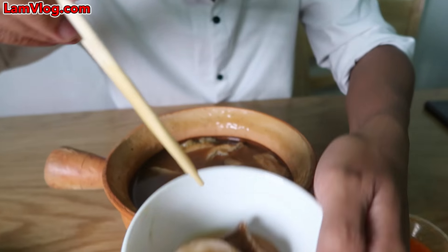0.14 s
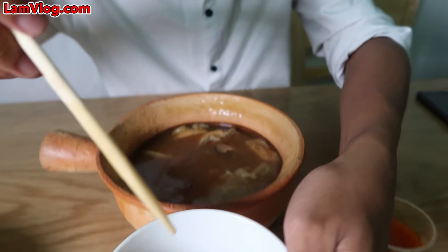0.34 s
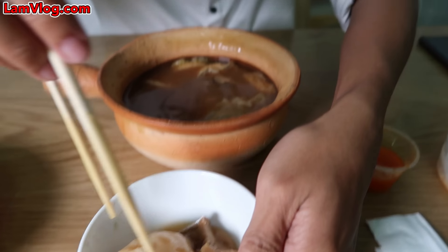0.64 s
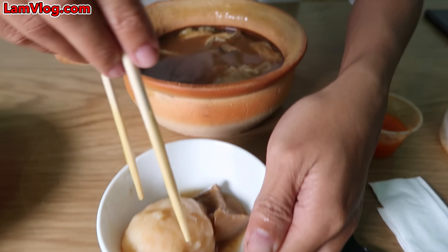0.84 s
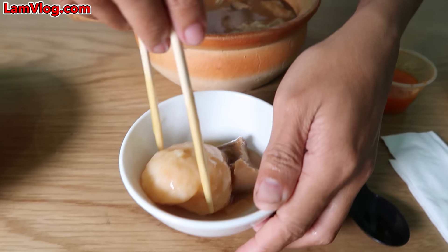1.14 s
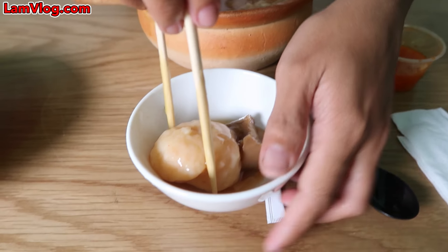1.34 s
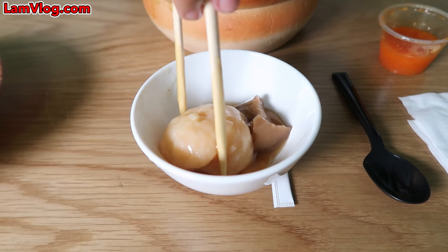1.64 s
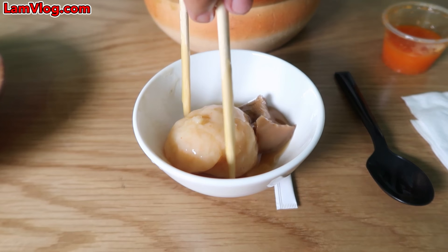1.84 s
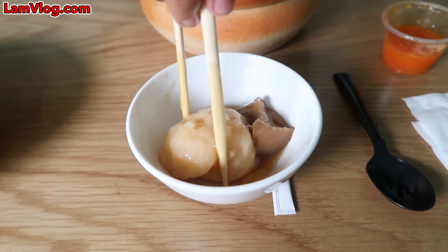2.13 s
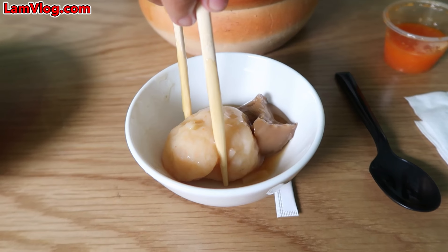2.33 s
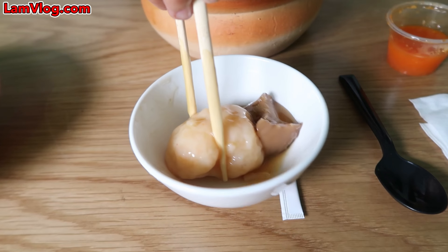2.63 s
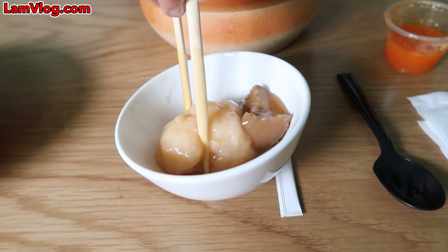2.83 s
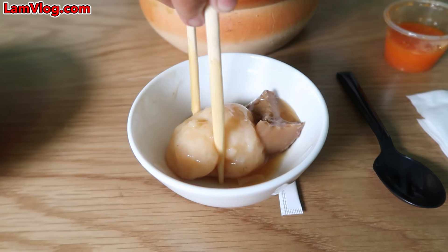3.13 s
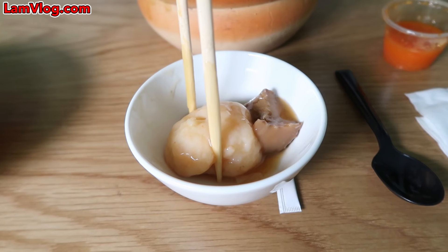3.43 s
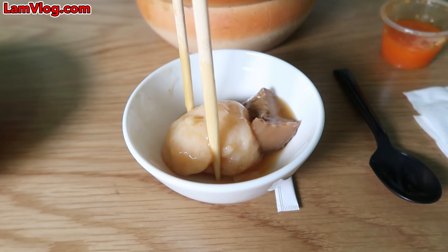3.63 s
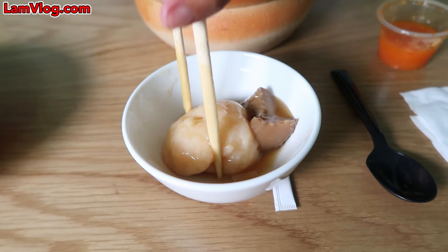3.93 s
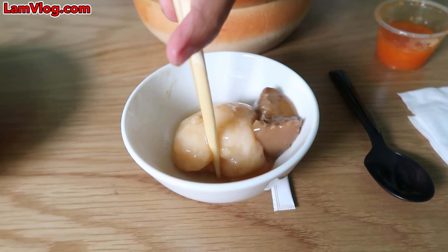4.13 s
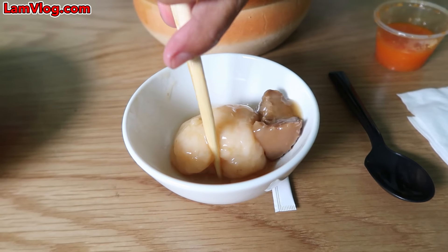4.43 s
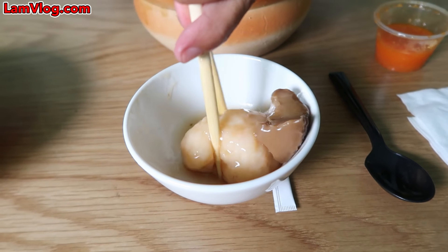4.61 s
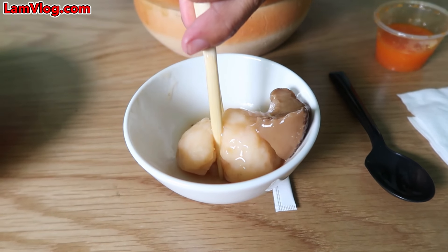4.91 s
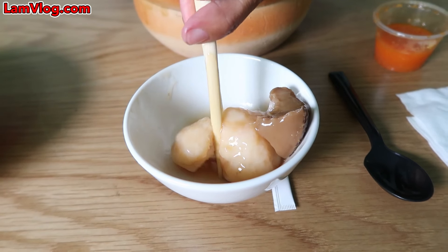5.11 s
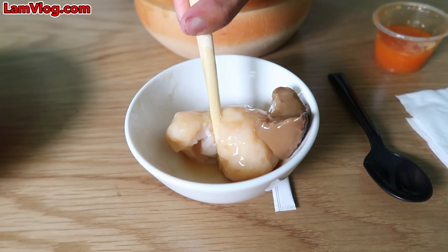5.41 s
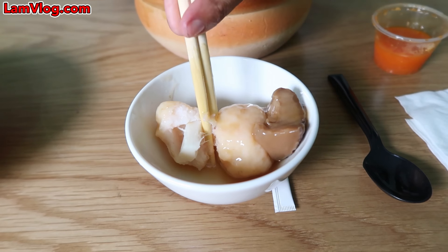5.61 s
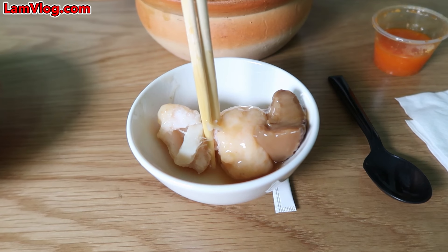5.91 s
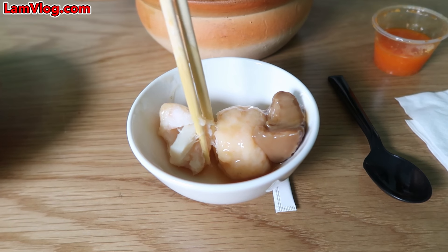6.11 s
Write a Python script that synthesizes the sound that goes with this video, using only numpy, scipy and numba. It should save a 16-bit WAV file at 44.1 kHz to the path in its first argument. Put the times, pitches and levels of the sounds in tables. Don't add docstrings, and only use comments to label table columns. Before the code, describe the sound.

Chopsticks tick and skid on a ceramic bowl that knocks a wooden table, while a cricket trills steadily over a humming room.

```python
import sys
import numpy as np
from scipy import signal
from scipy.fft import rfft, irfft
from scipy.io import wavfile
from scipy.ndimage import uniform_filter1d
from numba import njit

SR = 44100
rng = np.random.default_rng(int(sys.argv[2]) if len(sys.argv) > 2 else 0)


def generate_wav(signal):
    frames = np.transpose(np.atleast_2d(signal))
    scaled = np.clip(frames, -1, 1) * 32767
    pcm = np.round(scaled).astype(np.int16)
    wavfile.write(sys.argv[1], SR, pcm)


def voltage_ratio(level):
    return 10 ** (np.asarray(level, float) / 20)


N = 275972
TIME = np.arange(N) / SR

# pitch_hz, level_db (per Hz)
AIR_HISS = [(88, -25.5), (150, 1.5), (334, -7), (524, -14.5), (900, -18.5), (1360, -22), (3600, -27.5),
            (5000, -30.5), (7600, -35.5), (11000, -42), (13200, -45.5), (16000, -58)]
AIR_HISS_DB = -49.5
# pitch_hz, width_hz, level_db
ROOM_HUM = [(84.7, 22, 5), (128.2, 30, 2.5), (214.3, 18, -12)]
# time_s, level_db
HOUSE_BUSTLE = [(0.0, -50), (0.26, -44.5), (0.4, -42.5), (1.48, -53.5), (1.76, -49), (2.09, -48.5),
                (2.52, -50.5), (2.8, -48.5), (3.08, -51.5), (3.66, -56), (4.18, -50), (4.53, -52.5),
                (5.05, -52.5), (5.24, -51), (5.78, -49.5), (6.25, -53)]
# centre_s, half_length_s, level_db
ARM_LEANS = [
    (0.02, .06, -56),
    (.9, .12, -58),
    (2.15, .2, -55.5),
    (2.6, 0.17, -57),
    (2.95, .15, -50.5),
    (3.7, .15, -59),
    (4.045, .15, -57),
    (4.474, 0.14, -49.5),
    (4.8, 0.18, -55),
    (5.65, 0.21, -51.5),
]
FLOOR_RUMBLE_DB = -61.5
WHINE_HZ, WHINE_DB = 13060, -90
# pitch_hz, side_db
FAR_SIDE = [(60, -33), (110, -33.5), (200, -14.5), (380, -4.5), (700, -4), (1290, -2), (2380, -2.5),
            (4400, 0), (8120, 0), (15000, 3)]
# pitch_hz, side_db
NEAR_SIDE = [(60, -34), (110, -38.5), (200, -51), (380, -17.5), (700, -19.5), (1290, -14.5), (2380, -2.5),
             (4400, -1.5), (8120, 23), (15000, 2)]
# pitch_hz, t60_s
ROOM_DECAY = [(100, 0.78), (400, 0.33), (1500, 0.59), (4000, 0.25), (12000, 0.48)]

# centre_s, level_db
CHIRPS = [(0.184, -56.5), (0.422, -55), (0.677, -55), (0.911, -57), (1.162, -58), (1.417, -56.5),
          (1.668, -56), (1.886, -56.5), (2.149, -56), (2.396, -56), (2.615, -58), (2.867, -58.5),
          (3.106, -57.5), (3.37, -75), (3.671, -70), (3.871, -60), (4.113, -57), (4.385, -56.5),
          (4.621, -56.5), (4.886, -57), (5.122, -54.5), (5.369, -57), (5.597, -55.5), (5.822, -56.5),
          (6.092, -56)]
# pitch_hz, width_hz, level_db, half_swell_s
WING = [(4148, 180, -4.5, 0.11), (4340, 200, -2, 0.1), (4536, 217, 1.5, 0.059)]

# centre_s, half_length_s, level_db
RUSTLES = [
    (.49, .04, -58),
    (3.65, .06, -64),
    (5.36, .05, -60),
]

# start_s, level_db (peak), stick_hz, glaze_db (against the stick)
TICKS = [(0.4693, -53, 2450, -21), (1.727, -52.5, 2630, -2), (2.3634, -64, 3160, -7),
         (2.8165, -46, 1610, -35), (3.2874, -38, 1950, -26), (3.6102, -44.5, 2700, -27),
         (4.8641, -34, 1890, -2), (4.8774, -37.5, 1960, -11), (4.8854, -37.5, 2280, -7),
         (4.9574, -54, 1840, -8), (4.969, -56, 1910, 2), (5.041, -40, 2880, -3), (5.0703, -46, 1500, -14),
         (5.1861, -50.5, 2580, -14), (5.2167, -48, 2820, -15), (5.3026, -36.5, 2730, -43),
         (5.3105, -37, 2610, -34), (5.3214, -43, 2700, -27), (5.3345, -43.5, 2770, -38),
         (5.5324, -51, 3340, -8), (5.55, -52, 1900, -5), (5.5604, -46, 2180, -3.5),
         (5.5825, -29.5, 2050, -5), (5.6098, -41, 2120, 1), (5.7697, -35.5, 2030, 3), (5.776, -44, 2040, 4),
         (5.7936, -40.5, 2300, 3), (5.8034, -47, 1960, 0), (6.2197, -49, 2350, -22)]
# pitch_share (of stick_hz), level_db, t60_s
STICK_MODES = [(0.97, -3.5, 0.022), (1.317, -5, 0.0058), (0.772, -5.5, 0.02), (0.478, -4.5, 0.016)]
# pitch_hz, level_db, t60_s
GLAZE_MODES = [(6700, 7, 0.0062), (7470, -12.5, 0.0047), (9070, -4.5, 0.008), (11660, -16, .007)]
GLANCE_DB_PER_DB = 0.37
# start_s, level_db
PRESSES = [
    (4.868, -52.5),
    (5.305, -53),
    (5.582, -38.5),
    (5.6, -40),
    (5.772, -49),
    (5.795, -49.5),
]
# pitch_hz, level_db, t60_s
WALL_MODES = [(647, -8, 0.15), (764, -5, 0.11), (874, -5, 0.22), (1015, -4.5, 0.19), (1303, -8.5, 0.13)]
# start_s, level_db
RIM_PINGS = [
    (4.866, -36.5),
    (4.887, -36),
    (5.551, -46),
    (5.584, -47),
]
# pitch_hz, level_db, t60_s
RIM_MODES = [(2160, 0, .08)]

# start_s, level_db (peak), thud_hz, ring_db, brightness_db (per octave)
KNOCKS = [(0.47, -29.5, 340, -21, 4.5), (0.826, 5, 350, -29.5, -2), (0.9306, -17, 560, -25, -7),
          (1.124, -26, 260, -22, -6.5), (1.231, -27.5, 267, -16, -7), (1.382, -16.5, 435, -19.5, -3),
          (2.815, -22, 292, -22.5, -10), (3.185, -16.5, 264, -8, -3), (3.194, 3, 371, -20.5, 2),
          (3.202, -38, 340, -21, 3), (3.62, -47, 377, -27, 12.5), (4.43, -33, 287, -14, -3),
          (4.866, -28.5, 287, -20.5, -11.5), (4.879, -40, 338, -11, -9), (4.888, -36.5, 322, -11, -9),
          (5.071, -31.5, 305, -21, -8.5), (5.583, -30, 343, -12, 2), (5.601, -28.5, 284, -24, 2.5),
          (5.689, -37, 336, -14, -12), (5.7096, -31, 260, -18, 2), (5.724, -31.5, 320, -28, -4),
          (5.773, -36, 330, -11, 8), (5.799, -36, 326, -19, 8)]
# pitch_hz, level_db, t60_s
BOARD_MODES = [(167.1, -8.5, 0.28), (333, -0.5, .5), (407, -21, 0.22), (549.3, -3, 0.48),
               (709.6, -4.5, 0.39), (731, -10, 0.19), (877, -12.5, .25), (883, -8.5, 0.28),
               (1008, -19.5, 0.083), (1048, -12.5, 0.28), (1246, -12, 0.28), (1435, -13.5, 0.36),
               (1625, -11, .2), (1738, -5.5, 0.11)]
# pitch_hz, level_db, t60_s
BOARD_DENSE = [(60, -19.5, 0.31), (125.6, -9.5, 0.6), (306, 5, 0.1), (641, 1.5, 0.49), (990, -6.5, 0.078),
               (1750, -13, 0.68), (3000, -30.5, 0.26), (5000, -47, .2)]
# start_s, level_db, pitch_hz, t60_s
LEG_THUMPS = [
    (.84, -39.5, 63.7, .6),
    (2.829, -37.5, 73.6, .4),
    (5.589, -30.5, 72.3, 0.22),
]
RATTLE_DB, RATTLE_DB_PER_DB = -14, -0.05
LAND_S, LAND_DB_PER_DULL = 0.00025, -0.7
CONTACT_HZ, CONTACT_DB_PER_DB = 3450, 0.53
HAND_OFF_S, HAND_DAMP = 1.5, .5

# start_s, length_s, level_db
SKIDS = [(5.581, 0.0068, -35), (5.590, 0.011, -30.5), (5.495, .005, -60), (4.68, .01, -64),
         (2.362, .003, -60), (5.575, 0.0027, -50), (.827, 0.0062, -52), (3.186, .016, -52),
         (3.225, .02, -62), (5.545, .03, -60), (5.035, .012, -56)]
# pitch_hz, level_db (per Hz)
SKID_COLOUR = [(590, -21), (1000, -3), (2010, 1.5), (4020, 0.5), (4960, 4), (5970, -7.5), (7440, 2),
               (14200, -9), (16000, -25)]


def colour(x, points):
    hz, db = np.transpose(points)
    f = np.fft.rfftfreq(x.shape[-1], 1 / SR) + 1
    return irfft(rfft(x) * voltage_ratio(np.interp(np.log(f), np.log(hz), db)), x.shape[-1])


def band(x, hz, width):
    return signal.lfilter(*signal.iirpeak(hz, hz / width, SR), x)


def band_twice(x, hz, first_width, second_width):
    return band(band(x, hz, first_width), hz, second_width)


def level(x, db):
    return x * voltage_ratio(db) / np.sqrt(np.mean(x ** 2))


def walk(rate):
    k = int(SR / rate)
    held = np.repeat(rng.standard_normal(N // k + 1), k)
    return 1.8 * uniform_filter1d(uniform_filter1d(held, k), k)[:N]


def ring(modes, scatter_db, t, loose=0.0025):
    hz, db, t60 = np.transpose(modes)[:, :, None]
    chance = rng.standard_normal((2, *db.shape))
    tone = np.sin(2 * np.pi * hz * (1 + loose * chance[0]) * t)
    return (voltage_ratio(db + scatter_db * chance[1]) * tone * 1000. ** (-t / t60)).sum(axis=0)


def add(out, s, sound):
    i = int(s * SR)
    out[..., i:i + sound.shape[-1]] += sound[..., :N - i]


def pair(mid, other, side):
    return mid + colour(other, side) * np.array([[1], [-1]])


def air():
    noise = rng.standard_normal((2, N))
    hiss = level(colour(noise, AIR_HISS), AIR_HISS_DB) * voltage_ratio(0.8 * walk(2.0))
    hum = sum(voltage_ratio(db + 1.66 * walk(6)) * band_twice(noise, f, w, w) for f, w, db in ROOM_HUM)
    bustle = voltage_ratio(np.interp(TIME, *np.transpose(HOUSE_BUSTLE)))
    deep = band_twice(noise, 38, 30, 35)
    leans = sum(voltage_ratio(db) * np.exp(-((TIME - s) / half) ** 2) for s, half, db in ARM_LEANS)
    sway = voltage_ratio(FLOOR_RUMBLE_DB) + leans
    mix = hiss + level(hum, 0) * bustle + level(deep, 0) * sway
    whine = voltage_ratio(WHINE_DB) * np.sin(2 * np.pi * WHINE_HZ * TIME)
    return pair(mix[0], mix[1], FAR_SIDE) + whine


def cricket(stroke_hz=38.63, smear_s=0.32, between_db=-68):
    song, t = np.zeros((2, N)), TIME[:SR // 2]
    for s, chirp_db in CHIRPS:
        pace_hz = stroke_hz * (1 + .01 * rng.standard_normal())
        strokes = np.diff(np.floor(pace_hz * TIME[:SR]), prepend=0)
        smear = rng.standard_normal((2, len(t))) * 1000. ** (-t / smear_s)
        far = signal.fftconvolve(strokes[None], smear, axes=1)[:, SR // 2:SR]
        far = level(far, 0) + .7 * rng.standard_normal(far.shape)
        rest = voltage_ratio(between_db - chirp_db) * np.hanning(len(t))
        chirp = np.zeros_like(far)
        for k, (f, w, db, half) in enumerate(WING):
            swell = np.exp(-np.abs((t - .235 - .01 * k) / half) ** 3)
            chirp += (-1) ** k * voltage_ratio(db) * band_twice(far, f, w, w) * (swell + rest)
        first = max(int((.25 - s) * SR), 0)
        add(song, max(s - .25, 0), level(chirp, chirp_db - 5)[:, first:])
    return song[0] + voltage_ratio(-7.5) * song[1] * np.array([[1], [-1]])


def rustles(hz=1900):
    grains = rng.standard_normal(N) * voltage_ratio(2.4 * rng.exponential(size=N))
    grit = band_twice(grains, hz, 1.2 * hz, 1.2 * hz)
    return level(grit, 0) * sum(voltage_ratio(db) * np.exp(-((TIME - s) / half) ** 2) for s, half, db in RUSTLES)


def ticks():
    out, t = np.zeros((2, N)), TIME[:SR // 8]
    touch = 1 - np.exp(-(t / 0.0004) ** 2)
    for s, db, hz, glaze_db in TICKS:
        tilt_db = GLANCE_DB_PER_DB * (glaze_db + 31.5)
        modes = [(k * hz, g + tilt_db * np.log2(k), t60) for k, g, t60 in STICK_MODES]
        noise = rng.standard_normal((2, len(t)))
        burst = noise[0] * np.exp(-t / 0.0096)
        clatter = 0.89 * band(band_twice(burst, hz, hz, hz), hz, hz)
        stick = touch ** 2 * ring(modes, 1.8, t, loose=0.0047) + voltage_ratio(-1.5) * clatter
        snap = band_twice(noise[1], 8500, 9000, 9000) * np.exp(-t / 0.0012)
        glaze = voltage_ratio(-2) * ring(GLAZE_MODES, 2, t, loose=.01) + snap
        tick = stick / np.abs(stick).max() + voltage_ratio(glaze_db + 1) * glaze / np.abs(glaze).max()
        add(out, s + .0006, voltage_ratio(db + 6) * tick)
    fall = np.hanning(2 * len(t))[len(t):]
    for s, db in PRESSES:
        add(out, s, voltage_ratio(db) * touch * ring(WALL_MODES, 4.2, t, loose=0.022) * fall)
    for s, db in RIM_PINGS:
        add(out, s, voltage_ratio(db) * touch * ring(RIM_MODES, 0, t) * np.ones((2, 1)))
    return out


def board_bands():
    centres = 60 * 2 ** np.arange(0, 6.6, .5)
    noise = [band_twice(rng.standard_normal(N), f, f / 2, f / 2) * np.sqrt(SR / f) for f in centres]
    return centres[:, None], np.array(noise)


def board_rattle(t, bright_db, f, noise):
    hz, db, t60 = np.transpose(BOARD_DENSE)
    gain_db = np.interp(np.log(f), np.log(hz), db) + bright_db * np.log2(f / 400)
    fade_s = np.interp(np.log(f), np.log(hz), t60)
    return (voltage_ratio(gain_db) * noise * 1000. ** (-t / fade_s)).sum(axis=0) / 3


def knocks():
    out, t = np.zeros(N), TIME[:SR // 2]
    swing = 1 - np.exp(-t / 0.00067)
    centres, noise = board_bands()
    edge = np.sin(2 * np.pi * 950 * t) * np.exp(-t / 0.0024)
    click = np.sin(2 * np.pi * 2600 * t) * np.exp(-t / 0.0025)
    for s, db, hz, ring_db, bright_db in KNOCKS:
        thud = np.sin(2 * np.pi * hz * t) * np.exp(-(t * hz / 1.37) ** 4)
        thud += voltage_ratio(-6 + 2.6 * bright_db) * edge + voltage_ratio(-23 + 2.44 * bright_db) * click
        land_s = LAND_S * voltage_ratio(-LAND_DB_PER_DULL * bright_db)
        touch = 1 - np.exp(-(t / land_s) ** 2)
        damp = HAND_DAMP if s < HAND_OFF_S else 1
        struck = [(f, g + bright_db * np.log2(f / 400), t60 * damp) for f, g, t60 in BOARD_MODES]
        start = int(s * (SR - SR // 8))
        rattle = board_rattle(t, bright_db, centres, noise[:, start:start + len(t)])
        top = voltage_ratio(ring_db) * ring(struck, 2.4, t) + voltage_ratio(RATTLE_DB + RATTLE_DB_PER_DB * db) * rattle
        contact = signal.butter(3, CONTACT_HZ * voltage_ratio(CONTACT_DB_PER_DB * db), fs=SR)
        add(out, s + .0024, voltage_ratio(db) * signal.lfilter(*contact, touch * thud + swing * top))
    rock = np.zeros(N)
    for s, db, hz, t60 in LEG_THUMPS:
        add(rock, s, voltage_ratio(db) * np.minimum(t / 0.014, 1) * ring([(hz, 0, t60)], 0, t))
    return signal.lfilter(*signal.butter(2, 110, "high", fs=SR), out) + rock


def skids():
    clicks = rng.standard_normal(N) * voltage_ratio(2.3 * rng.exponential(size=N))
    grit = level(colour(clicks, SKID_COLOUR), 0)
    push = sum(voltage_ratio(db) * np.exp(-((TIME - s - d / 2) / (d / 2)) ** 4) for s, d, db in SKIDS)
    return grit * push


def room(x, wet_db, gap_s):
    t = np.arange(SR // 2 * 2) / SR
    hz, t60 = np.transpose(ROOM_DECAY)
    tail = np.zeros((2, len(t)))
    for f in 60 * 2 ** np.arange(0, 8.1, .5):
        fade_s = np.interp(np.log(f), np.log(hz), t60)
        tail += band(rng.standard_normal((2, len(t))), f, f / 3) * 1000. ** (-t / fade_s)
    tail *= np.clip(t / gap_s, 0, 1) * voltage_ratio(wet_db) / np.sqrt(np.sum(tail[0] ** 2))
    return signal.fftconvolve(x[None], tail, axes=1)[:, :N]


def scene():
    blows = knocks()
    tips = ticks() + skids() + rustles()
    table_tail = room(blows, -11.5, 0.0015)
    tip_tail = room(tips.mean(axis=0), -13, .004)
    near = pair(blows + table_tail[0], table_tail[1], NEAR_SIDE)
    return near + tips + pair(tip_tail[0], tip_tail[1], FAR_SIDE) + cricket() + air()


@njit
def follow(x, attack, release):
    y, e = np.empty(len(x)), 0.
    for i in range(len(x)):
        e += (x[i] - e) * (attack if x[i] > e else release)
        y[i] = e
    return y


def roll_off(x):
    return signal.sosfilt(signal.butter(12, 16290, fs=SR, output="sos"), x)


def record(dry, top_db=-22, squeeze=0.53, attack_s=0.021, release_s=0.31):
    ahead = np.roll(np.abs(dry).max(axis=0), -220)
    loud = follow(ahead, 1 / (attack_s * SR), 1 / (release_s * SR))
    gain = uniform_filter1d(np.maximum(loud / voltage_ratio(top_db), 1) ** -squeeze, size=220)
    rounded = 1.12 * np.tanh(dry * gain / 1.12)
    top = signal.butter(6, 15000, fs=SR, output="sos")
    return roll_off(signal.sosfilt(top, rounded))


dry = scene()
out = record(dry)
generate_wav(out)
```